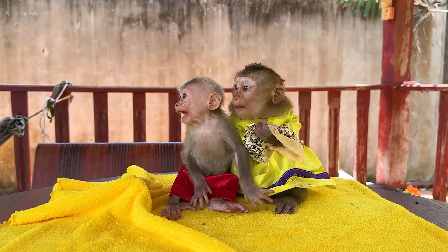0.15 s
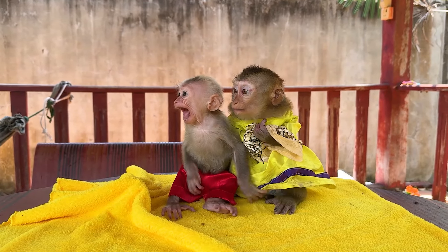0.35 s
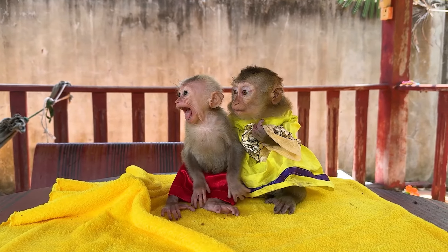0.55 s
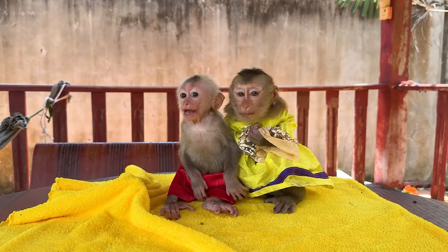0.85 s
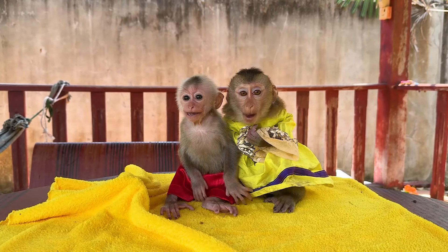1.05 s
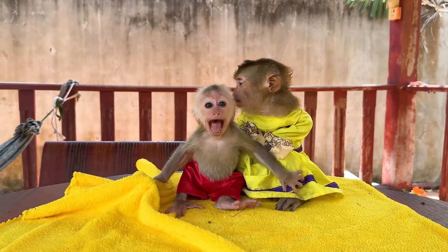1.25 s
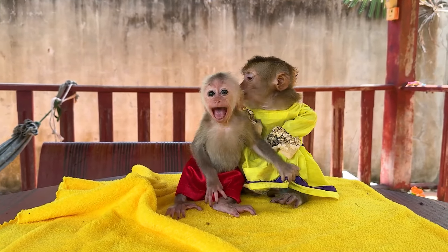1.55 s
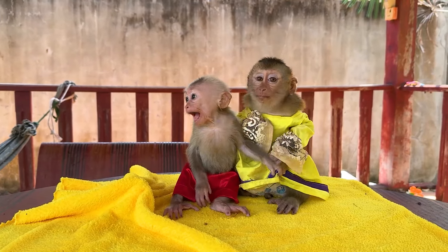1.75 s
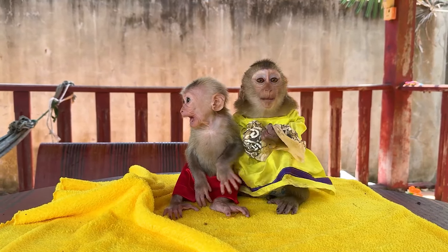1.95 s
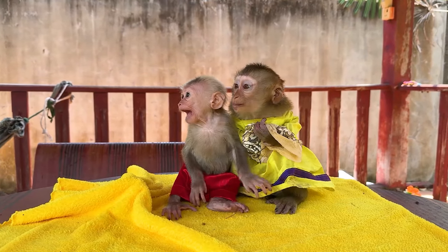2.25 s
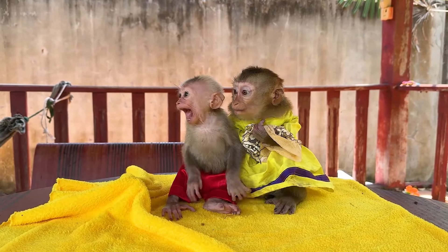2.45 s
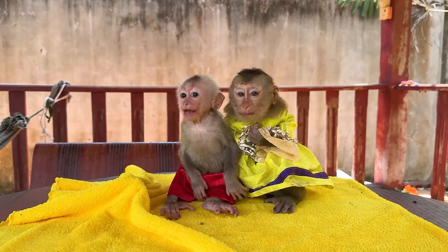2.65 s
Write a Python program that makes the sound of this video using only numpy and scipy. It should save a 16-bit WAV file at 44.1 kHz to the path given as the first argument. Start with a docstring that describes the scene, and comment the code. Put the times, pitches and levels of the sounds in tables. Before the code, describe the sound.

A young monkey's rasping scream plays at half speed, lowered and stretched, at 0.2-0.6 s, its echo fading. At 1.25 s it cuts to normal speed in another call's dying echo. Piercing whistle-to-rasp chirps come at 1.3, 1.47 and 1.63 s, a longer call at 2.13 s, then a long harsh scream at 2.37-2.54 s. Hard porch reflections, faint ticks and quiet low air surround them.

```python
"""A young monkey shrieks on a table on a hard-walled porch: three chirps, a longer call, a long rasping scream.
Each call is a very high whistle that breaks into a rasp of pulses and pulse-gated noise; voiced low notes
lie under some. Echoes are noise dying band by band; ticks, puffs and air are shaped noise.
First the long scream plays at half speed; then a cut to normal speed lands in an earlier chirp's fading echo."""
import sys
import numpy as np
from scipy import signal
from scipy.fft import rfft, irfft
from scipy.io import wavfile

SR = 44100
rng = np.random.default_rng(int(sys.argv[2]) if len(sys.argv) > 2 else 0)


def bounce(signal):
    """Save signal as a 16-bit WAV file at the path given by the first command-line argument."""
    frames = np.transpose(np.atleast_2d(signal))
    limited = np.clip(frames, -1, 1)
    pcm = np.round(limited * 32767).astype(np.int16)
    wavfile.write(sys.argv[1], SR, pcm)


N = 123479
LONG = N + SR // 5   # samples at normal speed

# Table times are on the normal-speed clock; levels are ahead of microphone colour.
# One contour per call: (time [s], whistle pitch [Hz], whistle level [dB], rasp level [dB],
# rasp tilt [dB per octave])
CALLS = [
    [(1.17, 7500, -54, -63, -2), (1.18, 7800, -39, -34.5, -2), (1.2, 6000, -27, -14, -9),
     (1.215, 5000, -59, -57.5, -13)],
    [(1.302, 5200, -51, -58, 5.5), (1.305, 5250, -20.5, -33.5, 7), (1.311, 5700, -24.5, -37, -2),
     (1.317, 7200, -25, -39.5, 2), (1.324, 8800, -23.5, -28, -1), (1.33, 9300, -23.5, -32, 0),
     (1.334, 7500, -31, -25.5, -7), (1.337, 4700, -20.5, -11.5, -9), (1.341, 5300, -27.5, -27.5, 3.5),
     (1.346, 5200, -35.5, -39, 3), (1.352, 5200, -71.5, -70, -3)],
    [(1.467, 7200, -47.5, -61.5, -1), (1.47, 7200, -19.5, -37.5, 3), (1.478, 7600, -33.5, -43.5, 5),
     (1.487, 8300, -12.5, -35, 8), (1.493, 9800, -10.5, -22, 2.5), (1.499, 8500, -29, -29, -7.5),
     (1.502, 5500, -18.5, -11, -5), (1.505, 4400, -22, -27.5, -8.5), (1.512, 5000, -44, -39, -10),
     (1.518, 5000, -63.5, -52.5, 1)],
    [(1.632, 7600, -54.5, -56, 12), (1.635, 7600, -24.5, -50.5, 3), (1.645, 7900, -25, -48, -2),
     (1.655, 8400, -15, -36, 4), (1.662, 9200, -28.5, -16, -0.5), (1.668, 7200, -25, -24, 1),
     (1.673, 5200, -21, -11, -7), (1.683, 5200, -33, -28.5, 9.5), (1.692, 5200, -63, -58, 0.5)],
    [(2.127, 7400, -56, -57.5, 3), (2.131, 7350, -33, -37, -8.5), (2.14, 7050, -31, -34, -7),
     (2.165, 8500, -24, -34, -6), (2.18, 9465, -30.5, -30, -2.5), (2.19, 9300, -35, -39.5, -4),
     (2.196, 8300, -19.5, -21, -1.5), (2.202, 7500, -33, -19.5, -6.5), (2.211, 5800, -35.5, -38.5, -2),
     (2.219, 5500, -48, -47.5, 13.5)],
    [(2.37, 4950, -48, -53, 4), (2.373, 5100, -29.5, -37.5, 2), (2.385, 7000, -23, -46.5, -9.5),
     (2.395, 8600, -21.5, -42.5, 0.5), (2.403, 9200, -29.5, -36, 0), (2.412, 8800, -44.5, -13.5, 4),
     (2.425, 8200, -21, -17, 1.5), (2.44, 7500, -26.5, -16, -3), (2.46, 7200, -33.5, -21, 3),
     (2.472, 6700, -28, -31, -8.5), (2.479, 6000, -21, -55, 2), (2.488, 5700, -23, -41.5, 2.5),
     (2.497, 6100, -18.5, -41, 0), (2.504, 7600, -25, -39, -0.5), (2.513, 8300, -29.5, -23, -3.5),
     (2.521, 6040, -19, -19, -1), (2.528, 4603, -20, -21, -8), (2.535, 4270, -36.5, -28, -5.5),
     (2.542, 4000, -59, -49, -0.5)],
]
# Whistle partials 1-3: (level [dB])
OVERTONES_DB = [0.5, 3, -9]
# Rasp spectrum at the mouth: (frequency [Hz], gain [dB])
THROAT = [(600, -38), (1500, -43), (2400, -23.5), (3300, -11.5), (5000, -12), (7500, 4), (11500, 4.5),
          (14500, -7), (21000, -11.5)]
# Low voiced notes under the rasp: (start [s], length [s], start pitch [Hz], end pitch [Hz], level [dB])
GRUNTS = [(1.333, 0.031, 1054, 961, -59), (1.491, 0.014, 1050, 990, -53.5), (2.197, 0.011, 991.7, 953, -48),
          (2.409, 0.055, 1444, 1010, -47)]
# Low-note partials 1-5: (level [dB])
GRUNT_PARTIALS_DB = [-4, -1.5, -4.5, -4.5, -8]
# Low puffs of air from the mouth: (centre time [s], level before low-pass and 20 dB lift [dB])
PUFFS = [(1.262, -60), (1.298, -60), (1.497, -57.5), (2.382, -58)]
# Faint ticks: (time [s], level [dB])
TICKS = [(1.841, -41.5), (2.298, -39.5), (2.723, -49), (2.748, -50.5)]
# Porch decay: (frequency [Hz], T60 [s])
PORCH_T60 = [(300, 0.87), (1500, 0.46), (3000, 0.24), (5500, 0.43), (8000, 0.26), (12000, 0.029),
             (18000, 0.19)]
# Air spectrum shape: (frequency [Hz], relative density [dB per Hz])
AIR = [(18, -46.5), (30, -20.5), (75, -4), (400, -17), (866, -21.5), (1160, -21), (14000, -32.5),
       (16000, -50.5)]
# Correlation of diffuse sound between channels: (frequency [Hz], correlation [0-1])
LIKENESS = [(60, 0.8), (400, 0.87), (2500, .2), (7000, 0.3), (8500, 1)]
# Colour of both microphones: (frequency [Hz], gain [dB])
COLOUR = [(100, 10), (1500, 1.5), (4600, 2), (5700, 1), (6250, 1), (7000, -2), (10500, -4.5),
          (12000, -11.5), (12700, -25.5), (13300, -8.5), (14300, 1), (16000, -9.5), (19000, -5.5)]
# Level difference of the pair: (frequency [Hz], left over right [dB])
PAN = [(300, 0.5), (1000, 2), (1600, -5.5), (3300, 2.5), (5000, 3), (6500, 7), (7700, 3.5), (8800, -4.5),
       (9500, 0)]
# Phase difference of the pair: (frequency [Hz], right leads by [rad])
RIGHT_LEADS = [(0, 0), (1000, -.5), (1800, .3), (2900, -3.5), (3300, -6), (4300, -6.9), (6000, -6.6),
               (7300, -4.1), (8300, -5.9), (11500, .95), (19000, 16.65)]

WAVER, WAVER_IN_RASP = 0.0068, 0.02   # share of pitch; the second adds in full where rasp equals whistle
CHOP = 1.5   # depth of pulses on the whistle at full rasp
PULSE_HZ, PULSE_JITTER = 1000, 0.025   # rate where no low note sets it; share of rate
RASP_NOISE = 0.4   # power share
PIVOT_HZ = 7000
TORN_DB, TORN_HZ, FLUTTER_DB = 4.5, 50, 5   # spread per rasp band, its rate; whistle spread at full rasp
GRUNT_SETTLE_S = 0.011
PUFF_HALF_S, PUFF_HZ = 0.014, 700
PORCH_DB, PORCH_GAP_S = -9.5, 0.003
EARLY_DB, EARLY_T60_S = -1.5, 0.054
AIR_DB = -59
CUT_S, SLOW_FROM_S = 1.2535, 2.262   # normal speed from; scene moment where half speed starts
TOP_HZ, STOPBAND_HZ = 19800, 16700


def amp(db):
    """Decibels to amplitude."""
    return 10 ** (np.asarray(db) / 20)


def rms_one(x):
    """Scales to RMS 1."""
    return x / np.sqrt(np.mean(x ** 2) + 1e-20)


def at_hz(points, hz):
    """Reads a table over log frequency."""
    p = np.array(points)
    return np.interp(np.log(np.maximum(hz, 1)), np.log(p[:, 0]), p[:, 1])


def shaped(x, gain):
    """Multiplies the spectrum by gain(Hz)."""
    n = x.shape[-1]
    return irfft(rfft(x) * gain(np.arange(n // 2 + 1) * SR / n), n)


def band(x, centre, centres):
    """One of a set of overlapping bands, triangular over log frequency."""
    return shaped(x, lambda f: np.interp(np.log(f + 1), np.log(centres), centres == centre))


def drift(n, rate_hz):
    """Low-passed noise, spread 1."""
    return rms_one(shaped(rng.standard_normal(n), lambda f: 1 / (1 + (f / rate_hz) ** 2)))


def monkey():
    """All calls, dry."""
    out = np.zeros(LONG + SR)
    for rows in CALLS:
        start, sound = call(rows)
        out[start:start + len(sound)] += sound
    return out[:LONG]


def call(rows):
    """Whistle and rasp follow one contour; pulses chop the whistle as the rasp takes over."""
    s, *columns = np.transpose(rows)
    start, n = int(s[0] * SR), SR // 4
    t = (start + np.arange(n)) / SR
    hz, whistle_db, rasp_db, tilt = [np.interp(t, s, c) for c in columns]
    on = (t >= s[0]) & (t <= s[-1])
    rough = 1 / (1 + amp(whistle_db - rasp_db) ** 2)   # rasp share of power

    hz = hz * (1 + (WAVER + 2 * WAVER_IN_RASP * rough) * drift(n, 400))
    tone = whistle(hz)
    cycle = np.cumsum(pulse_rate(t) * (1 + PULSE_JITTER * drift(n, 60))) / SR
    tone = tone * (1 + CHOP * rough * np.cos(2 * np.pi * cycle))
    tone_gain = np.sqrt(2) * amp(whistle_db + FLUTTER_DB * rough * drift(n, 250))
    return start, on * (tone_gain * tone + amp(rasp_db) * rasp(cycle, tilt))


def whistle(hz):
    """Harmonic sines, each faded out just under the top frequency."""
    phase = 2 * np.pi * np.cumsum(hz) / SR
    out = np.zeros(len(hz))
    for k, db in enumerate(OVERTONES_DB, 1):
        out += amp(db) * np.sin(k * phase) * np.clip((TOP_HZ - k * hz) / 500, 0, 1)
    return out


def rasp(cycle, tilt):
    """Pulses and noise decaying in each pulse, throat-shaped, tilted about the pivot and torn band by band."""
    n = len(cycle)
    pulses = rms_one(sum(np.cos(2 * np.pi * k * cycle) for k in range(1, 17)))
    pulses = pulses * amp(0.9 * drift(n, 150))
    gated = rms_one(rng.standard_normal(n) * np.exp(-2.0 * (cycle % 1)))
    mix = np.sqrt(1 - RASP_NOISE) * pulses + np.sqrt(RASP_NOISE) * gated
    mix = rms_one(shaped(mix, lambda f: amp(at_hz(THROAT, f)) * (f > 500)))

    centres = PIVOT_HZ * 2. ** np.arange(-3, 1.6, .25)
    out = np.zeros(n)
    for c in centres:
        band_db = tilt * np.log2(c / PIVOT_HZ) + TORN_DB * drift(n, TORN_HZ)
        out += amp(band_db) * band(mix, c, centres)
    return out


def settling_hz(t, start_hz, end_hz):
    """Pitch relaxing exponentially from start to end."""
    return end_hz + (start_hz - end_hz) * np.exp(-t / GRUNT_SETTLE_S)


def pulse_rate(t):
    """Pulses at the pitch of a low note starting in the first 0.1 s of the call, else a constant rate."""
    hz = np.full(len(t), float(PULSE_HZ))
    for s, _, start_hz, end_hz, _ in GRUNTS:
        if t[0] <= s <= t[0] + .1:
            hz = settling_hz(np.maximum(t - s, 0), start_hz, end_hz)
    return hz


def grunts():
    """A few clean partials whose pitch settles downward."""
    out = np.zeros(LONG)
    for s, length, start_hz, end_hz, db in GRUNTS:
        t = np.arange(int(length * SR)) / SR
        phase = 2 * np.pi * np.cumsum(settling_hz(t, start_hz, end_hz)) / SR
        partials = sum(amp(p) * np.sin(k * phase) for k, p in enumerate(GRUNT_PARTIALS_DB, 1))
        envelope = np.sqrt(np.sin(np.pi * t / length))
        out[int(s * SR):int(s * SR) + len(t)] += amp(db) * envelope * partials
    return out


def puffs():
    """Low-passed noise under a smooth hump."""
    out, half = np.zeros(LONG), int(PUFF_HALF_S * SR)
    for s, db in PUFFS:
        centre = int(s * SR)
        out[centre - half:centre + half] += amp(db) * np.hanning(2 * half) * rng.standard_normal(2 * half)
    return 10 * shaped(out, lambda f: (f > 120) / (1 + (f / PUFF_HZ) ** 2))


def ticks():
    """Differentiated noise dying within milliseconds."""
    out = np.zeros(LONG)
    for s, db in TICKS:
        burst = np.diff(rng.standard_normal(201)) * np.exp(-np.arange(200) / 40)
        out[int(s * SR):int(s * SR) + 200] += amp(db) * burst
    return out


def porch(x):
    """Echoes as diffuse noise dying band by band, with a stronger, faster-dying first cluster."""
    n = SR // 2
    t, centres = np.arange(n) / SR, np.geomspace(150, 19000, 12)
    noise = diffuse(n)
    tail = sum(amp(-60 * t / at_hz(PORCH_T60, c)) * band(noise, c, centres) for c in centres)
    early = noise[:, ::-1] * amp(-60 * t / EARLY_T60_S)   # reversed so as not to match the tail
    echo = (amp(PORCH_DB) * rms_one(tail) + amp(EARLY_DB) * rms_one(early)) / np.sqrt(n)
    echo = np.pad(echo, [(0, 0), (int(PORCH_GAP_S * SR), 0)])
    return signal.fftconvolve(x[None], echo, axes=1)[:, :LONG]


def diffuse(n):
    """Two noises correlated by band, from mid and side."""
    mid, side = rng.standard_normal((2, n))
    mid = shaped(mid, lambda f: np.sqrt(1 + at_hz(LIKENESS, f)))
    side = shaped(side, lambda f: np.sqrt(1 - at_hz(LIKENESS, f)))
    return np.array([mid + side, mid - side])


def air():
    """Outdoor background: shaped diffuse noise, level wavering gently."""
    both = shaped(diffuse(LONG), lambda f: amp(at_hz(AIR, f)) * (f > 25))
    return amp(AIR_DB + 2 * drift(LONG, 6)) * rms_one(both)


def scene():
    """The porch through the microphone pair at normal speed, with the half-speed passage put in front."""
    side = np.array([[.5], [-.5]])   # left, right
    voice = monkey() + grunts()
    near = voice + porch(voice) + puffs() + ticks()   # puffs and ticks have no echo
    near = shaped(near, lambda f: amp(at_hz(COLOUR, f) + side * at_hz(PAN, f)) * (f < TOP_HZ))
    lead_hz, lead_rad = np.transpose(RIGHT_LEADS)
    heard = shaped(near + air(), lambda f: np.exp(-1j * side * np.interp(f, lead_hz, lead_rad)))

    cut, first = int(CUT_S * SR), int(SLOW_FROM_S * SR)
    slow = signal.resample(heard[:, first:], 2 * (LONG - first), axis=1)
    return np.concatenate([slow[:, :cut], heard[:, cut:N]], axis=1)


def record(dry):
    """Steep low-pass, 80 dB down from the stopband edge."""
    return signal.sosfilt(signal.cheby2(14, 80, STOPBAND_HZ, fs=SR, output="sos"), dry)


dry = scene()
out = record(dry)
bounce(out)
```